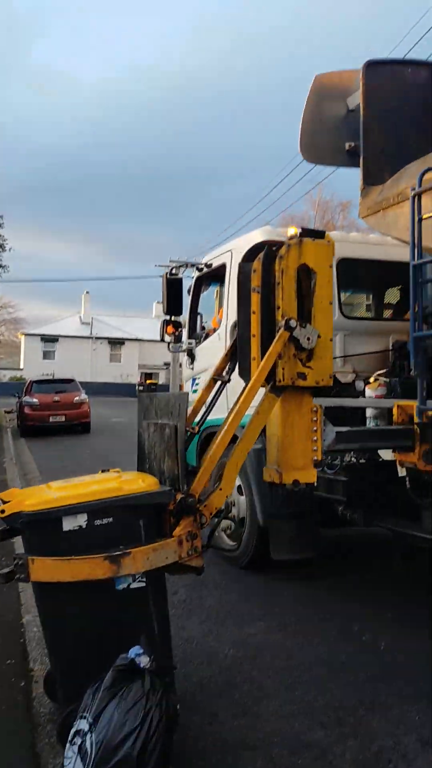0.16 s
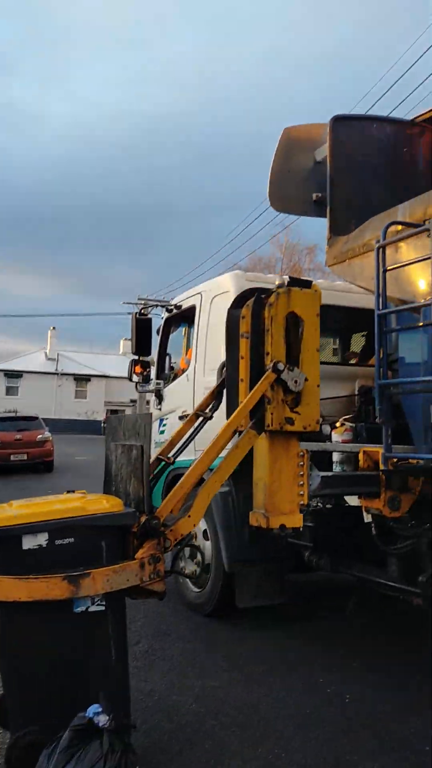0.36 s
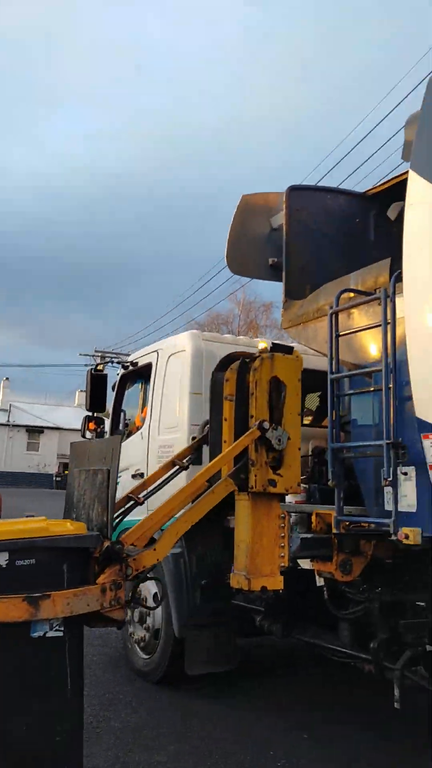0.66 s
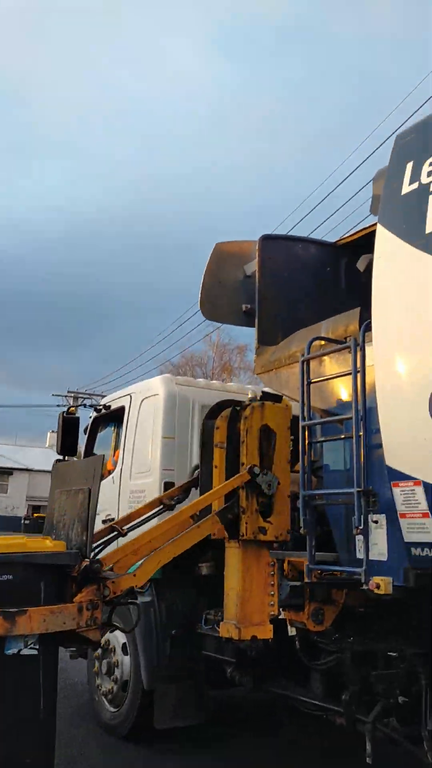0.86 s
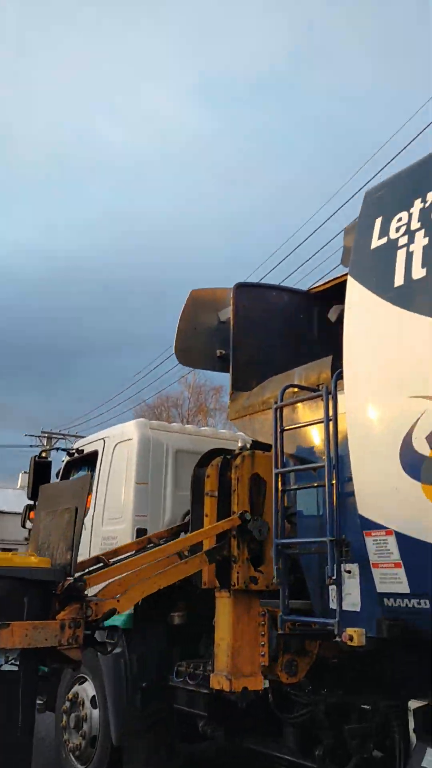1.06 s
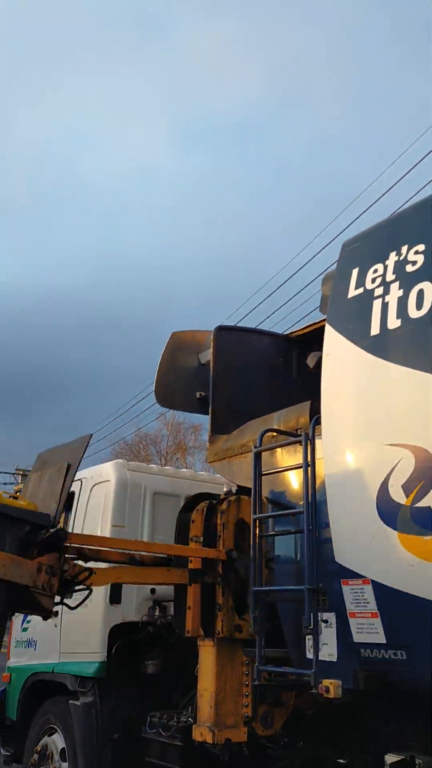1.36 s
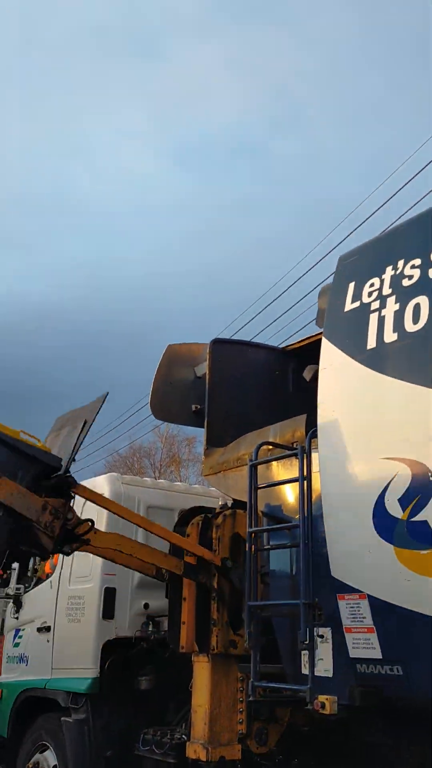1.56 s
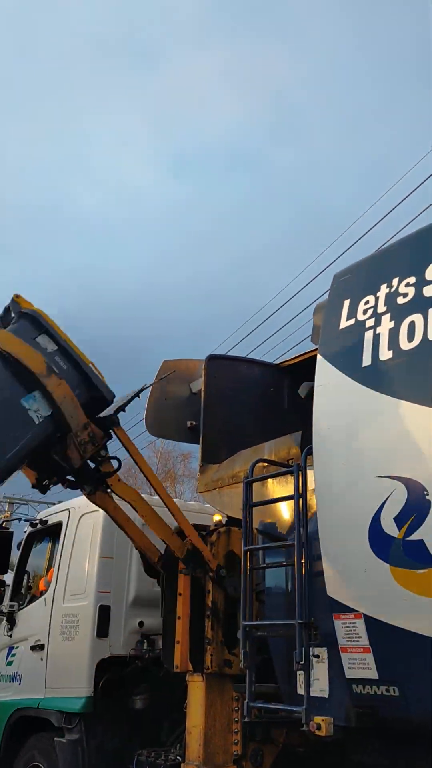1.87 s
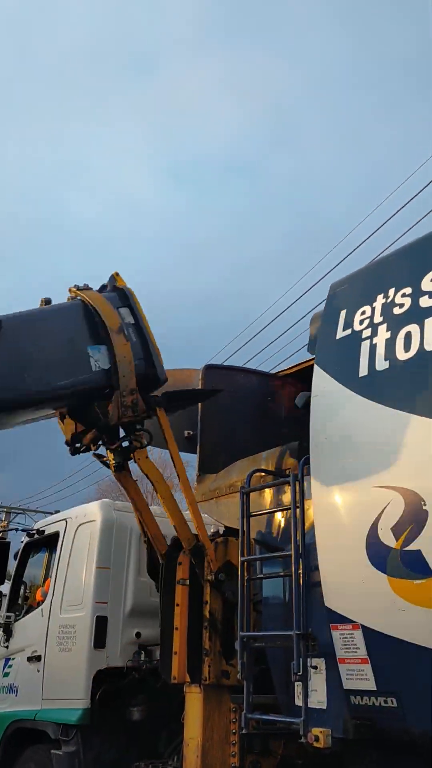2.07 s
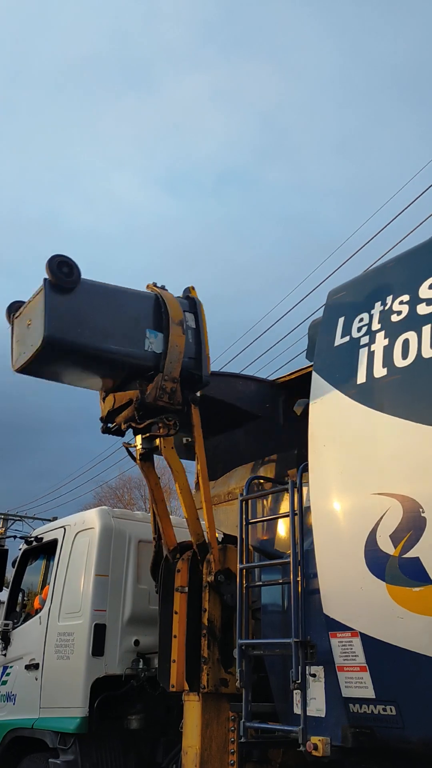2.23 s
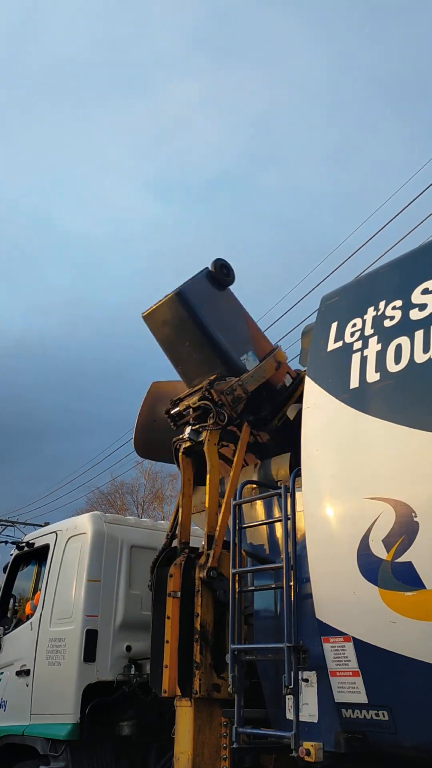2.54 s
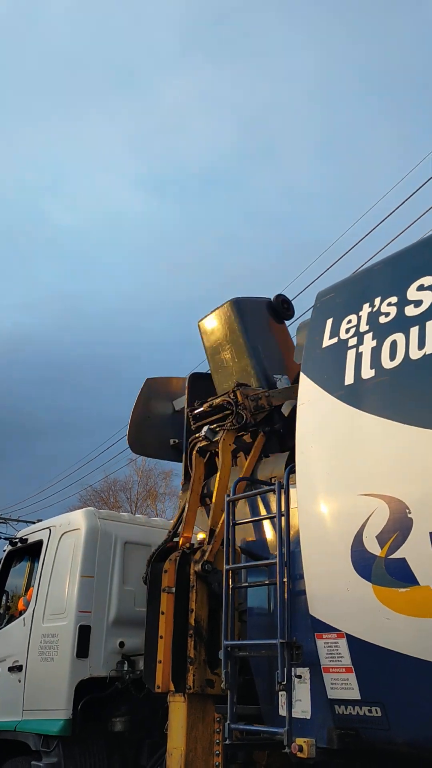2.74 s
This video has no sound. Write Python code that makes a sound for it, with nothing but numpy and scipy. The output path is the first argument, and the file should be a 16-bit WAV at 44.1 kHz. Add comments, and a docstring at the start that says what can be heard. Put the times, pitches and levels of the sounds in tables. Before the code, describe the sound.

Hydraulic bin lift on a clattering diesel truck, with whine, creaks, a hollow knock, squeals and wind buffeting

```python
"""A diesel refuse truck grips a wheelie bin and swings it up, heard from the kerb.
From the start the engine clatters in bursts at a raised idle, oil hisses and the pump whines as wobbling tones.
The gripper creaks and squeaks in gliding tones, and gusts of low noise soon buffet the microphone.
A valve whistles thinly; then the bin knocks as it leaves the ground, ringing in resonances set off by noise.
The loaded pivot squeals twice, and a valve sizzles as the bin tips. A limiter turns down the loudest moments."""
import sys
import numpy as np
from scipy import signal
from scipy.fft import rfft, irfft
from scipy.io import wavfile
from scipy.ndimage import uniform_filter1d

SR = 44100
rng = np.random.default_rng(int(sys.argv[2]) if len(sys.argv) > 2 else 0)


def to_wav(sig):
    """Store sig (one row per channel, or 1-D mono) as 16-bit WAV at the path in sys.argv[1].

    Samples outside -1..1 are clipped; the rate is SR.
    """
    pcm = np.clip(np.atleast_2d(sig), -1, 1) * 32767
    pcm = np.round(pcm).astype(np.int16)
    wavfile.write(sys.argv[1], SR, pcm.T)  # frames by channels


N = 127890
T = np.arange(N) / SR   # time of every sample, s
CUTOFF_HZ = 15750   # nothing is kept above this
# colour of the oil hiss, which also colours the creak: [f/Hz, relative level per Hz/dB]
HISS_SPECTRUM = [(2500, -3.5), (4200, -7.5), (5000, -11), (6200, -11), (7300, -4), (8100, -5.5),
                 (8900, -16), (10500, -14.5), (13000, -7.5), (14200, -4)]


def from_db(db):
    """Turn decibels into a gain."""
    return 10 ** (np.asarray(db) / 20)


def rms_one(x):
    """Scale a sound to an average strength (rms) of 1."""
    return x / np.sqrt(np.mean(x ** 2) + 1e-20)


def in_time(rows):
    """Draw straight lines between the rows, giving each column a value at every sample."""
    times, *columns = np.transpose(rows)
    return [np.interp(T, times, column) for column in columns]


def at_hz(points, hz):
    """Read a spectrum's level in dB at the given frequencies, along a log frequency axis."""
    f, db = np.transpose(points)
    return np.interp(np.log(hz + 1e-3), np.log(f), db)


def drift(rate):
    """Random wandering with spread 1; a higher rate in Hz wanders faster."""
    step = 40   # computed at every 40th sample, then joined by straight lines
    r = np.exp(-2 * np.pi * rate * step / SR)
    raw = rng.standard_normal(N // step + 2002)
    slow = signal.lfilter([1], [1, -2 * r, r * r], raw)[2000:]   # drop the filter's start-up
    return np.interp(np.arange(N) / step, np.arange(len(slow)), rms_one(slow))


def coloured(x, spectrum, ripple_db=2.27, ripple_hz=45):
    """Shape a sound by a spectrum, with a fine random ripple like many small resonances."""
    hz = np.arange(N // 2 + 1) * SR / N
    ripple = np.interp(hz / ripple_hz, np.arange(SR), rng.standard_normal(SR))
    gain = from_db(at_hz(spectrum, hz) + ripple_db * ripple)
    return irfft(rfft(x) * gain * (hz < CUTOFF_HZ), N)


def noise(spectrum):
    """Steady coloured noise with rms 1."""
    return rms_one(coloured(rng.standard_normal(N), spectrum))


def tone(hz, wobble, wobble_rate, slope_db, count):
    """A tone of wobbling pitch; each overtone is slope_db from the last, the fundamental has rms 1."""
    phase = 2 * np.pi * np.cumsum(hz * (1 + wobble * drift(wobble_rate))) / SR
    out = np.zeros(N)
    for k in range(count):
        below_limit = (k + 1) * hz < SR / 2   # leave out overtones too high for the sample rate
        out += from_db(slope_db * k) * np.sin((k + 1) * phase) * below_limit
    return np.sqrt(2) * out


def gate(start, end):
    """Open between two times, with 3.1 ms fades."""
    return np.clip(np.minimum(T - start, end - T) / 0.0031, 0, 1)


def squeal(curve, wobble, slope_db, count=2, flutter_db=4):
    """A gliding, fluttering tone in two strands whose pitch and level wander apart."""
    hz, db = in_time(curve)
    strands = np.zeros(N)
    for _ in range(2):
        strands += from_db(flutter_db * drift(26)) * tone(hz, wobble, 260.7, slope_db, count)
    return gate(curve[0][0], curve[-1][0]) * from_db(db) * strands / np.sqrt(2)


def engine():
    """Each firing of six cylinders throws a dying burst of clatter over steady machinery noise."""
    # engine speed: [t/s, firing rate/Hz]
    firing = [(0, 41.05), (1.55, 42.35)]
    # how hard each cylinder fires, in firing order: [relative level/dB]
    cylinder_db = [7.5, 3, 4, 10.5, 5, 8]
    # colour of the clatter and machinery noise: [f/Hz, relative level per Hz/dB]
    engine_spectrum = [(40, 16), (85, 9.5), (250, 2), (400, -4), (630, 5), (900, -3), (1300, 1.5),
                       (1850, 0), (2300, -5.5), (2950, -4), (3700, -19), (9000, -42)]
    # loudness of the whole engine: [t/s, level/dB]
    load = [(0, -28), (.11, -25.5), (.2, -28), (.65, -29), (1.05, -27), (1.27, -32), (1.41, -23),
            (1.52, -27), (2.5, -26)]
    knock_decay_s, clatter_share = 0.014, 0.56   # decay of a firing; amplitude share of the bursts
    rate, = in_time(firing)
    turns = np.cumsum(rate) / SR + .75   # counts firings; starts three quarters through one
    n = np.floor(turns).astype(int)
    strength = from_db(np.array(cylinder_db)[n % 6] + rng.normal(0, 0.8, 200)[n])
    since_firing_s = (turns % 1) / rate
    bursts = rms_one(strength * np.exp(-since_firing_s / knock_decay_s))
    clatter = clatter_share * bursts * noise(engine_spectrum)
    steady = np.sqrt(1 - clatter_share ** 2) * noise(engine_spectrum)
    return from_db(in_time(load)[0]) * (clatter + steady)


def hydraulics(flutter_db=1.46, whine_flutter_db=-1.5):
    """Oil rushing through valves makes fluttering noise; pump and gears whine in wobbling tones."""
    # oil flow, as the middle level of its fluttering hiss: [t/s, level/dB]
    flow = [(0, -37.5), (.1, -28.5), (.27, -35.5), (.52, -28.5), (.63, -33.5), (1.2, -30.5), (1.3, -36.5),
            (1.38, -31.5), (1.52, -34.5), (1.76, -36), (2.22, -33.5), (2.72, -34.5), (2.8, -43), (2.9, -31)]
    # a valve sizzles as the bin tips: [t/s, level/dB]
    throttle = [(1.8, -41), (2.05, -33.5), (2.4, -34), (2.8, -44)]
    # pump and gear whines, one curve each, before flutter: [t/s, f/Hz, level/dB]
    whines = [
        [(0, 572, -48), (.78, 586, -39.5), (1.45, 604, -46), (1.85, 610, -39.5), (2.55, 621, -34.5),
         (2.9, 624, -73)],
        [(.18, 641, -38), (.62, 635, -45), (.82, 640, -32.5), (1.3, 651, -56), (2.9, 657, -44.5)],
    ]
    throttle_hz = 14300
    out = from_db(in_time(flow)[0] + flutter_db * drift(42)) * noise(HISS_SPECTRUM)
    sizzle = noise([(.8 * throttle_hz, -18), (throttle_hz, 0), (1.1 * throttle_hz, -2)])
    out += from_db(in_time(throttle)[0]) * sizzle
    for curve in whines:
        hz, db = in_time(curve)
        whine = tone(hz, wobble=0.0042, wobble_rate=22.2, slope_db=-18.5, count=3)
        out += from_db(db + whine_flutter_db * drift(30)) * whine
    return out


def creak():
    """The gripper sticks and slips on the bin: a fundamental and nine equally strong overtones, then
    coloured like the hiss."""
    # the creak before flutter and colouring: [t/s, f/Hz, level/dB]
    creak_curve = [(.04, 1520, -41), (.115, 1610, -31), (.14, 1590, -41)]
    return coloured(squeal(creak_curve, wobble=.008, slope_db=0, count=10), HISS_SPECTRUM)


def squeaks(flutter_db=3):
    """Gripper and links stick and slip in short pure tones that glide, swell and fade."""
    # squeaks before swell and flutter: [t/s, length/s, start f/Hz, end f/Hz, level/dB]
    squeak_times = [(.145, 0.068, 4400, 4160, -39), (.205, 0.077, 3250, 2840, -39.5),
                    (.325, 0.074, 2430, 2380, -40), (.42, 0.052, 3400, 3360, -38),
                    (.84, 0.056, 2890, 2780, -34), (0.947, 0.059, 2830, 2900, -37),
                    (.99, 0.068, 2313, 1872, -31.5), (1.06, 0.066, 1782, 1710, -29.5),
                    (1.19, 0.024, 4270, 4300, -35), (2.19, 0.069, 2130, 1990, -32)]
    out = np.zeros(N)
    for start, length, start_hz, end_hz, db in squeak_times:
        along = np.clip((T - start) / length, 0, 1)   # 0 at its start, 1 at its end
        swell = np.sqrt(np.abs(np.sin(np.pi * along)))
        level = from_db(db + flutter_db * drift(60))
        hz = start_hz + (end_hz - start_hz) * along
        out += swell * level * tone(hz, wobble=.02, wobble_rate=188, slope_db=0, count=1)
    return out


def wind():
    """Lumpy low noise in half-octave bands that brightens in strong gusts, plus push-pull thumps."""
    # gust strength before the lumps and brightening: [t/s, level/dB]
    gusts = [(.19, -40), (.235, -19), (.4, -17), (.58, -22.5), (.66, -31), (.73, -20), (.86, -21.5),
             (1.07, -34.5), (1.16, -17), (1.27, -15), (1.33, -23.5), (1.49, -16.5), (1.54, -24),
             (1.58, -21), (1.9, -26), (2.3, -35), (2.535, -23), (2.555, -14.5), (2.63, -14), (2.77, -24),
             (2.82, -29)]
    # colour of the wind when its strength is -15 dB: [f/Hz, relative level per Hz/dB]
    wind_spectrum = [(20, -0.5), (45, -4.5), (100, 2), (160, -4.5), (260, -9), (400, -13.5), (650, -23),
                     (1200, -48)]
    # single eddies thump the microphone, before the band filter: [t/s, peak level/dB, centre to peak/s]
    buffets = [(.577, -8, .0014), (.732, -11, .0014), (1.494, -4, .0022), (1.581, -8, .001),
               (1.692, -6, .0011), (2.554, -6, .001), (2.566, -5, .0008), (2.58, -6, .0012),
               (2.605, -4, .0007), (2.648, -9, .001), (2.691, -8, .0008), (2.708, -7, .0008),
               (2.748, -5, .0006), (2.776, -8, .0009)]
    # band kept of each thump: [lowest f/Hz, highest f/Hz]
    thump_band = (40, 600)
    lumpy_db, gust_brightens = 2.5, 0.28   # fast swing; extra swing per octave above 100 Hz
    db = in_time(gusts)[0] + lumpy_db * (drift(39) - .3)
    edges = 18 * 2 ** np.arange(0, 6.6, .5)
    centres = np.sqrt(edges[1:] * edges[:-1])
    gains = from_db(at_hz(wind_spectrum, centres)) * np.sqrt(centres)   # wider bands hold more power
    gains = gains / np.linalg.norm(gains)
    out = np.zeros(N)
    for low, high, hz, gain in zip(edges, edges[1:], centres, gains):
        band_filter = signal.butter(2, [low, high], "band", fs=SR, output="sos")
        band = signal.sosfilt(band_filter, rng.standard_normal(N + SR // 2))[-N:]
        tilt_db = gust_brightens * np.log2(hz / 100) * np.minimum(db + 15.0, 5)
        out += gain * rms_one(band) * from_db(db + tilt_db)
    thump_filter = signal.butter(2, thump_band, "band", fs=SR, output="sos")
    for centre, peak_db, width in buffets:
        u = (T - centre) / width
        thump = from_db(peak_db) * u * np.exp(1 - np.abs(u))
        out += signal.sosfilt(thump_filter, thump + 1e-18)   # the tiny offset avoids slow arithmetic
    return out


def valve_whistle():
    """A valve whistles in two thin, wandering pure tones."""
    # whistle before flutter: [t/s, f/Hz, level/dB]
    whistle = [(.47, 8280, -46), (.55, 8170, -42.5), (.71, 8040, -39), (.78, 8260, -40.5), (.99, 8250, -46),
               (1.08, 8310, -41), (1.24, 8000, -37.5), (1.3, 7920, -54), (1.62, 8270, -43)]
    return squeal(whistle, wobble=0.00443, slope_db=0, count=1)


def scraped(force, modes, grain_db=3):
    """Rough contact, as noise, drives each resonance in fits of its own."""
    out = np.zeros(N)
    for hz, width, db in modes:
        r = np.exp(-np.pi * width / SR)   # a wider resonance dies sooner
        contacts = force * rng.standard_normal(N) * from_db(db + grain_db * (drift(56) - 1.0))
        drive = np.sqrt(1 - r) * np.array([.5, 0, -.5])
        ring = [1, -2 * r * np.cos(2 * np.pi * hz / SR), r * r]
        out += signal.lfilter(drive, ring, contacts)
    return out


def knocks():
    """Each knock is a dying scuffle of contacts that rings the bin and makes the links screech."""
    # knocks of bin and arm, as driving force: [t/s, body level/dB, screech level/dB, decay/s]
    knock_times = [(1.086, -22, -32, 0.02), (1.102, -26.5, -18.5, 0.025), (1.124, -14, -20.5, .014),
                   (1.141, -37, -21.5, 0.068)]
    # hollow ring of the bin: [f/Hz, width/Hz, relative level/dB]
    bin_modes = [(345, 34, -1.5), (493, 150, 5), (776, 170, 4), (1060, 360, -2.5), (1650, 570, -4)]
    # screech of the steel links: [f/Hz, width/Hz, relative level/dB]
    link_modes = [(2300, 1800, -6), (4200, 130, -8.5), (5530, 170, -8.5), (7430, 400, -0.5),
                  (14640, 1100, 2)]
    body, screech = np.zeros((2, N))
    for start, body_db, screech_db, decay in knock_times:
        fall = (T >= start) * np.exp(-np.abs(T - start) / decay)
        body += from_db(body_db) * fall
        screech += from_db(screech_db) * fall
    return scraped(body, bin_modes) + scraped(screech, link_modes)


def pivot_squeals():
    """The loaded pivot sticks and slips, squealing twice in gliding tones with one overtone."""
    # the two squeals, one curve each, before flutter: [t/s, f/Hz, level/dB]
    squeal_curves = [
        [(1.36, 7870, -37), (1.405, 5730, -38), (1.435, 5760, -32), (1.465, 5410, -42), (1.515, 5290, -43)],
        [(1.555, 5680, -52), (1.605, 5280, -39), (1.628, 4810, -42), (1.655, 5330, -33), (1.68, 5900, -47),
         (1.73, 5900, -52)],
    ]
    return sum(squeal(curve, wobble=.02, slope_db=-7) for curve in squeal_curves)


def street(x):
    """Twelve scattered early echoes, 3 to 51 ms late, from the truck's side and the road."""
    echo_db, echo_s = -12, .03   # level before the fade; time over which echoes fade
    out = x.copy()
    for lag in rng.uniform(.1, 1.7, 12):   # in units of echo_s
        n = int(lag * echo_s * SR) + 1
        out[n:] += from_db(echo_db) * np.exp(-lag) * rng.choice([-1, 1]) * x[:-n]
    return out


def scene():
    """Add up the truck, its arm echoing in the street, and wind at the microphone."""
    arm = creak() + squeaks() + valve_whistle() + knocks() + pivot_squeals()
    return (engine() + hydraulics() + street(arm) + wind())[None]


def record(dry):
    """A limiter ducks up to 6 dB on loud peaks, what remains is rounded, and the top is cut."""
    limit_db, release_db_per_s, ceiling = -4, 101, 0.5   # ceiling as an amplitude
    over = np.clip(20 * np.log10(np.abs(dry[0]) + 1e-9) - limit_db, 0, 6)
    # ducking jumps up with a peak, then lets go at a steady rate
    release = release_db_per_s * T
    held = np.maximum.accumulate(over + release) - release
    limited = dry * from_db(-uniform_filter1d(held, size=130))   # smoothed over 130 samples
    rounded = limited / (1 + (limited / ceiling) ** 6) ** (1 / 6)
    top_cut = signal.ellip(12, .2, 80, CUTOFF_HZ, fs=SR, output="sos")
    return signal.sosfilt(top_cut, rounded)


dry = scene()
out = record(dry)
to_wav(out)
```